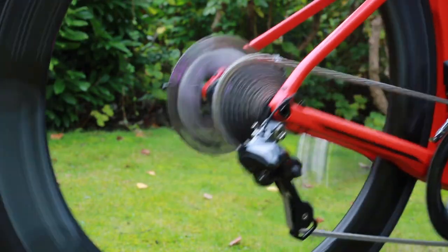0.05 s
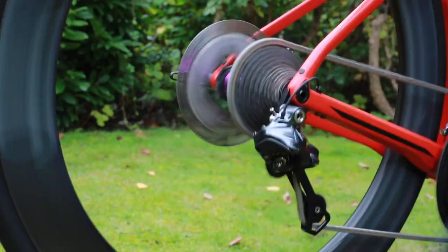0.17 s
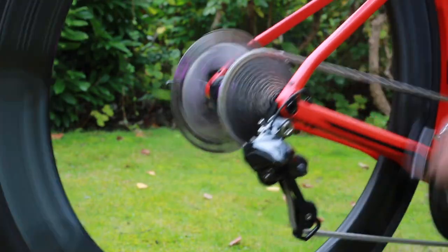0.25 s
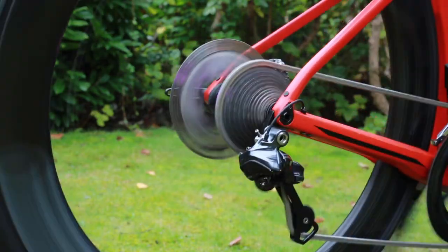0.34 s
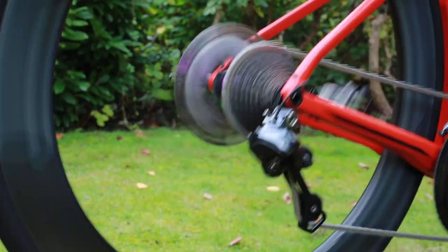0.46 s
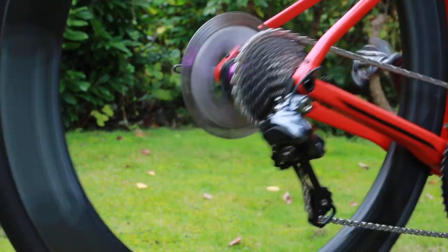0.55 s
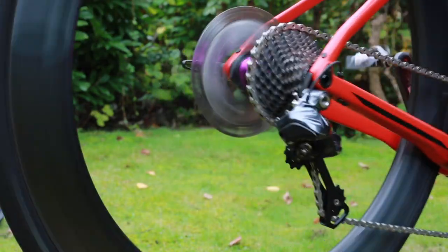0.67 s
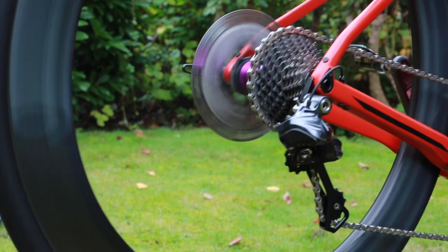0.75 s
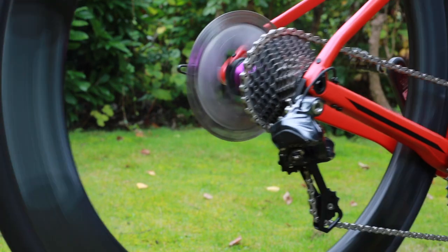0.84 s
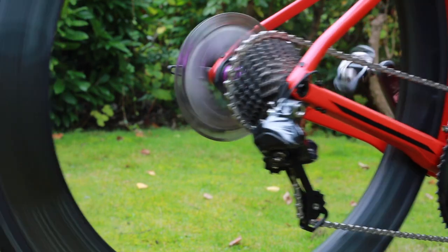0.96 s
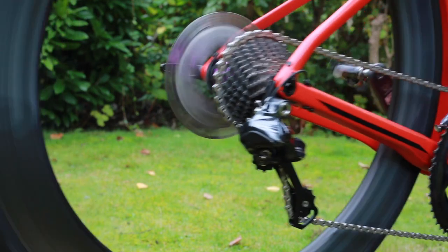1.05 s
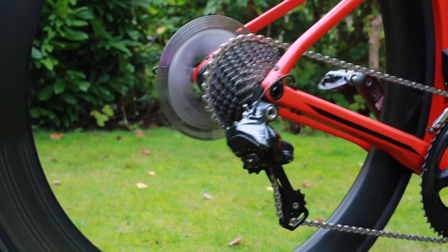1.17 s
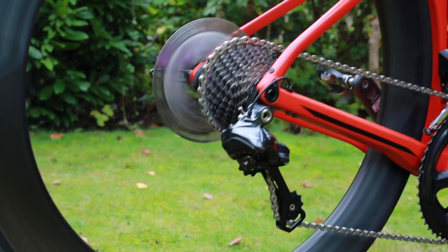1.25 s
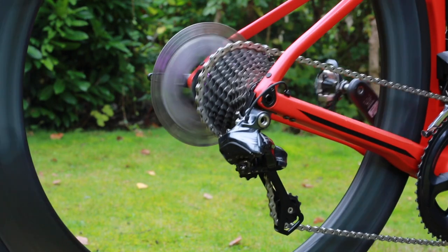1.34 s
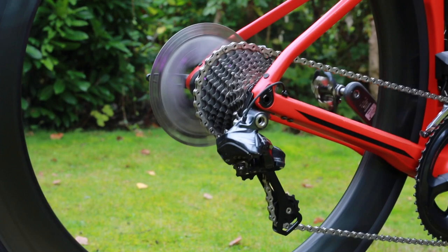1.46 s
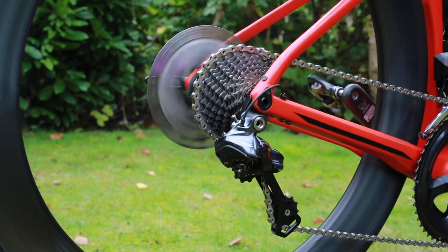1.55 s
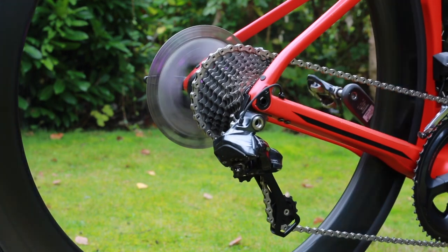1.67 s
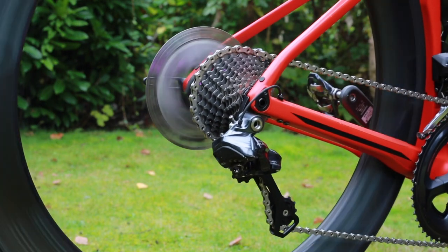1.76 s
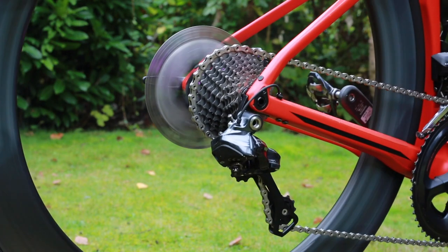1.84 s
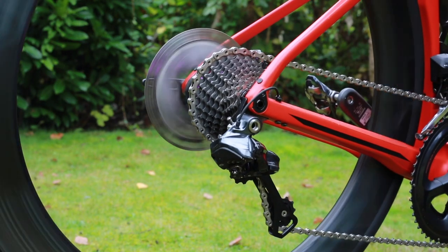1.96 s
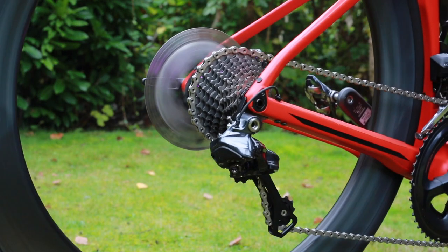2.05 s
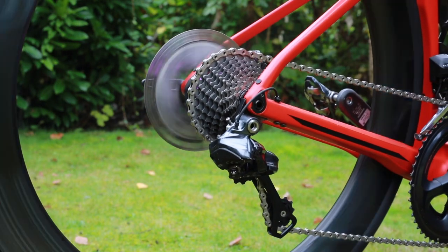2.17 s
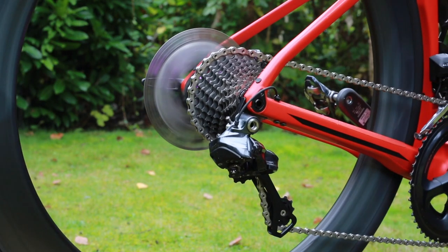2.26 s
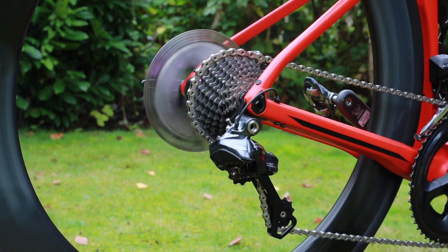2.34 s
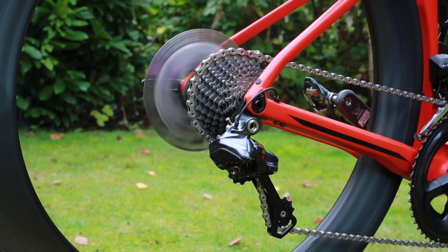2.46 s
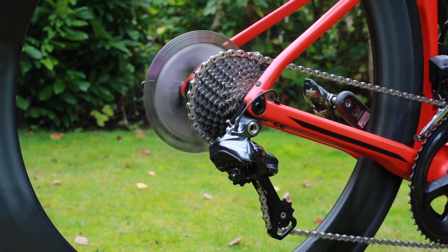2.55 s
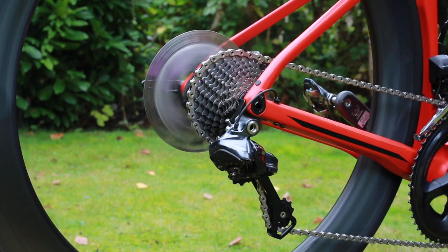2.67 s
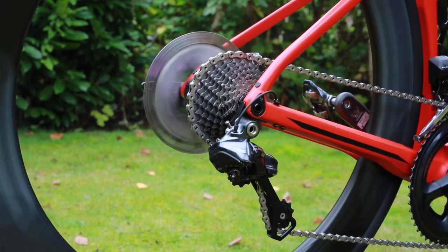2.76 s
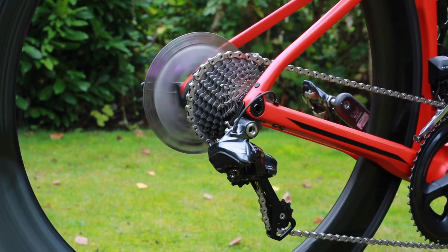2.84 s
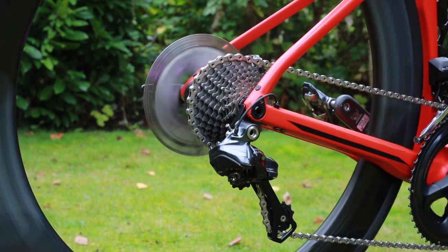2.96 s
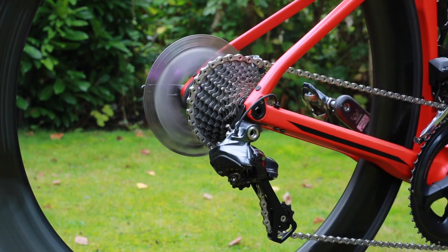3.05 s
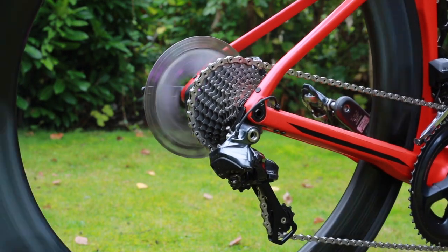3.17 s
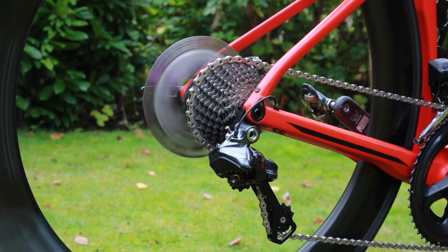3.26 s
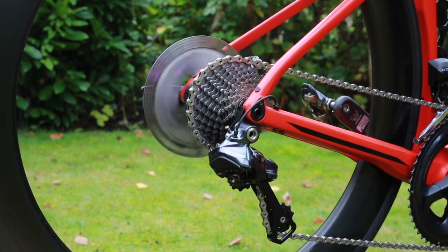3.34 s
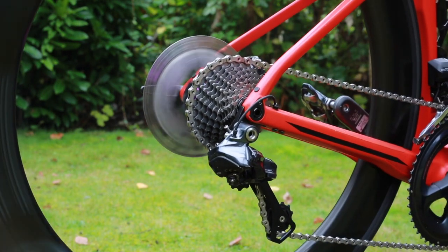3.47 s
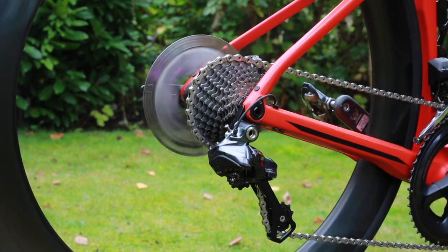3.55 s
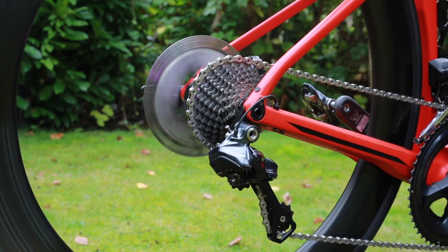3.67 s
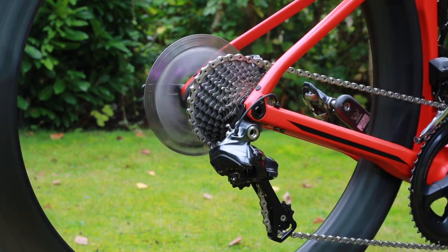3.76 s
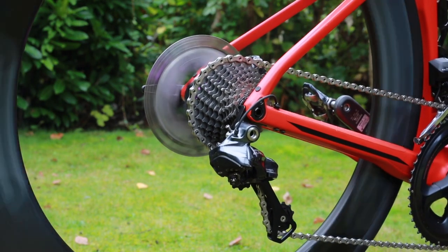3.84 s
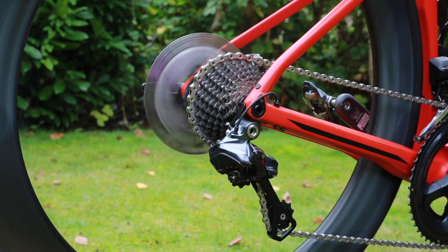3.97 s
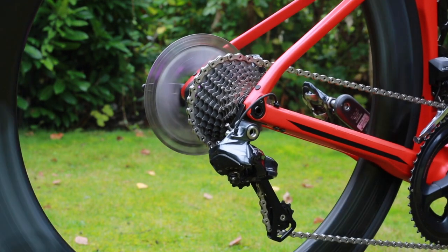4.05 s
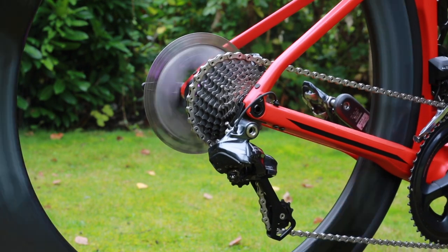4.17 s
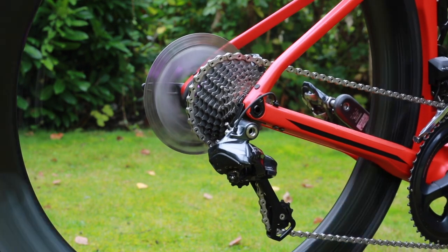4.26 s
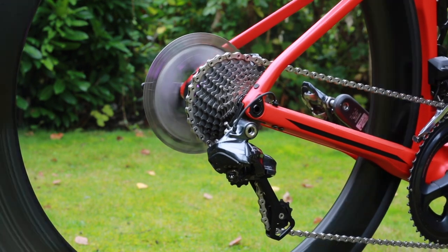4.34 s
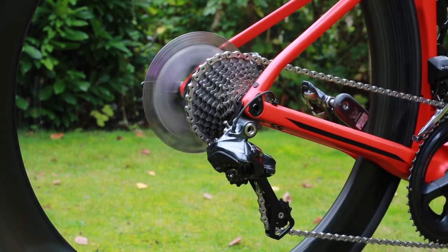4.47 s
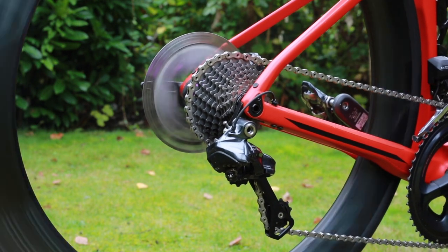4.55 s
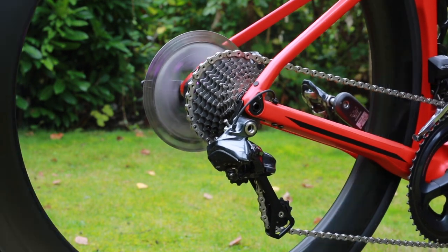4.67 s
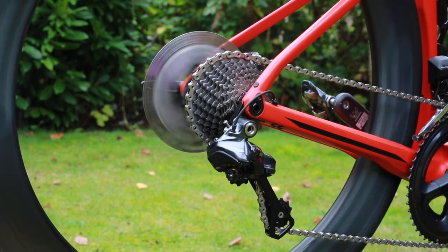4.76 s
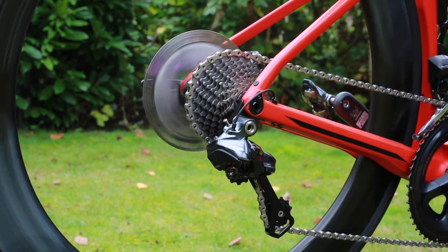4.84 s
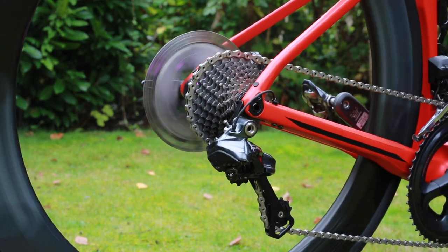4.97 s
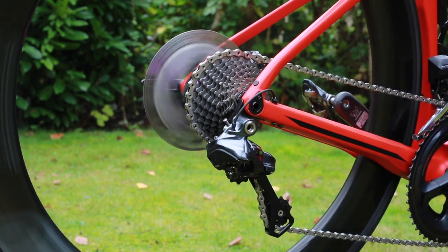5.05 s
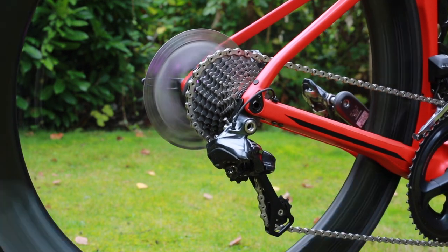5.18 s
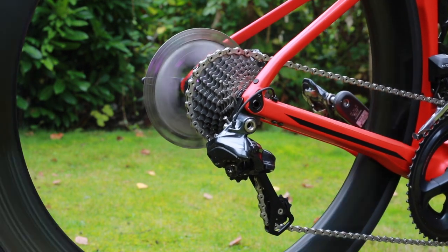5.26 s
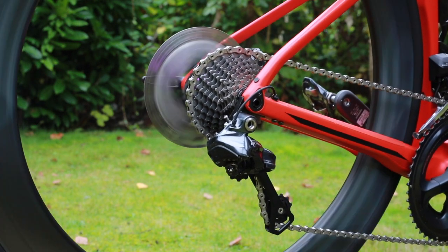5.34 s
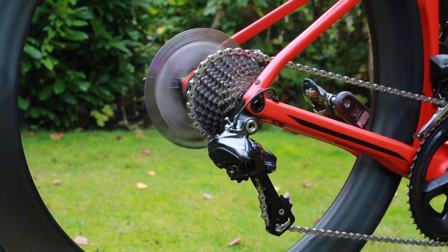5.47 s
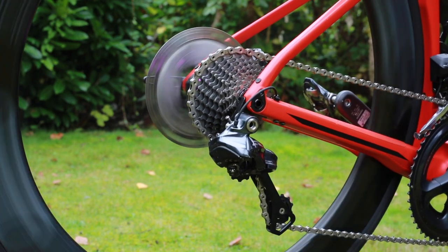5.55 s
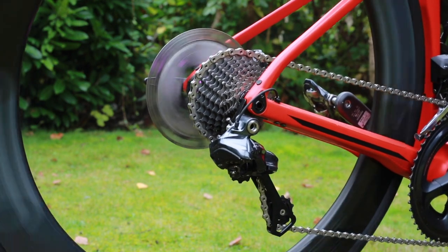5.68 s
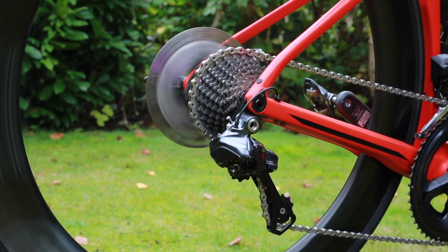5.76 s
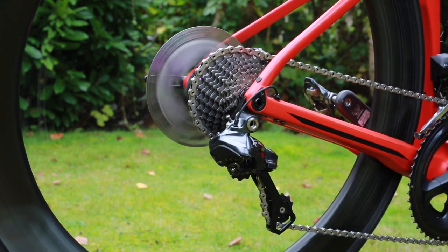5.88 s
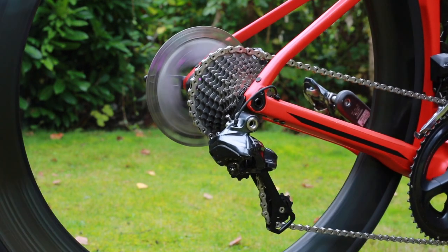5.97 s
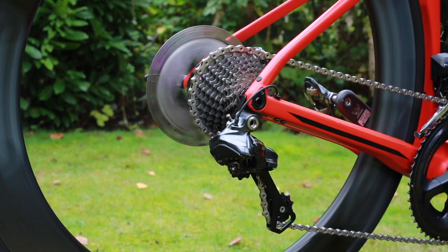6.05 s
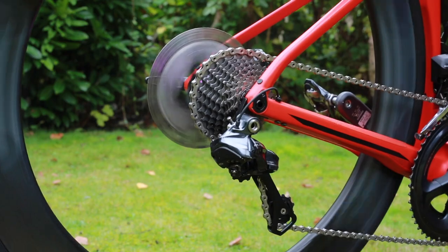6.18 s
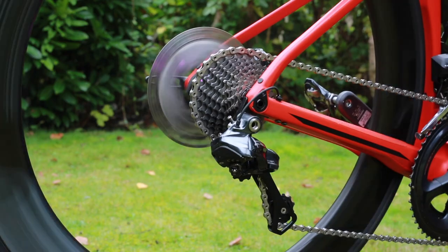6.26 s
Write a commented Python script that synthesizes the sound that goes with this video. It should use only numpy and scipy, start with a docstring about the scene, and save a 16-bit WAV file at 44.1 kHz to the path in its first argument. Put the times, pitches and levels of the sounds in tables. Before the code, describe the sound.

Outdoors, one close microphone hears a bicycle's spinning rear wheel in dry mono. From 0 s there is a low, wavering hum with soft rumble, airy whirr and very fast chain ticking over sprockets. A short metallic rattle comes at 0.12 s, and the chain slaps the frame dully at 0.21 s. Around 0.5 s the drive slackens with a quick cluster of clacks; chain ticking dies by 0.6 s and the air noise drops. From about 0.57 s the freewheel ratchet takes over: a loud, bright, gritty metallic buzz, its pitch climbing until about 0.7 s. Then it sinks smoothly, from roughly 300 tooth clicks a second to about 245 by the end, slightly uneven and shimmering as hub and rim turn. The low hum continues underneath. After 5.15 s everything fades a little, still buzzing at 6.3 s.

```python
"""A bicycle on a stand in a garden, heard by one microphone. From the start there is a low hum with rumble and the
whirr of stirred air, while the chain ticks over the sprockets; the drive slackens over a few lone teeth, and
the chain slaps the frame once. The pedal is let go and the wheel coasts: sprung pawls snap over the ratchet ring
a few hundred times a second and ring the hub, sprockets and deep rim. The buzz climbs as the sprockets run down
to rest, then sinks in pitch as the wheel slows; near the end everything fades a little."""
import sys
import numpy as np
from scipy import signal
from scipy.fft import rfft, irfft
from scipy.io import wavfile

SR = 44100
rng = np.random.default_rng(int(sys.argv[2]) if len(sys.argv) > 2 else 0)


def log_audio(samples):
    """Write samples as a 16-bit WAV file to the path given in sys.argv[1]."""
    # one column per channel
    frames = np.atleast_2d(samples).T
    # limit to full scale, then quantise
    limited = np.clip(frames, -1, 1)
    pcm = np.round(limited * 32767).astype(np.int16)
    wavfile.write(sys.argv[1], SR, pcm)


N = 278491
TIME_S = np.arange(N) / SR

# The low hum, wavering. Each row: time in seconds, first tone in Hz, its octave over the first tone in dB.
HUM_COURSE = [(0, 66.2, -1), (3.5, 66.5, -2), (4.75, 67.6, 1.5), (5.75, 66.4, -2.5), (6.31, 66.1, -5)]
# Spectrum of the rumble. Each row: frequency in Hz, relative level per Hz in dB.
RUMBLE_SPECTRUM = [(15, -39), (25, -12), (54, -24), (102, 4), (134, 1), (152, -1), (177, 2), (221, 3),
                   (327, -20), (500, -15), (650, -54), (1100, -120)]
# Spectrum of the stirred air. Each row: frequency in Hz, relative level per Hz in dB.
WHIRR_SPECTRUM = [(150, -24), (260, -7), (420, -11.5), (930, 0), (1300, 1.5), (1950, -6), (5300, -11.5),
                  (8600, -7), (15500, -23)]
# The chain running over the sprockets. Each row: time in seconds, links per second, level in dB.
CHAIN_RUN = [(0, 124, -35), (.2, 140, -35.5), (.45, 144, -33.5), (.5, 200, -34), (.56, 120, -29),
             (.62, 48, -60)]
# What rings in the chain. Each row: frequency in Hz, width in Hz, relative level in dB.
LINK_MODES = [(3030, 730, -11), (4050, 230, 0.5), (6630, 400, 4), (8400, 680, 2), (11700, 1700, -12.5),
              (13200, 1500, -21)]
# Single teeth skipped while the drive slackens. Each row: start in seconds, blow in dB,
# spread of the pawls in ms, build-up as a plain number (over 1 swells first).
SKIPPED_TEETH = [(.1165, 17.5, 2.2, 2.9), (0.4844, 18.5, 4.7, 1.09), (0.503, 18, 4.5, 0.91),
                 (0.5441, 21, 1.9, 1.8)]
# The chain slaps the frame. Each row: start in seconds, blow in dB, rattle in ms.
FRAME_KNOCKS = [(0.2135, 14, 4.4)]
# What rings in the frame when slapped. Each row: frequency in Hz, width in Hz, level in dB.
FRAME_MODES = [(584, 80, 5), (930, 73, 5), (1410, 260, 0.5), (2660, 1400, -10), (4680, 1400, -5),
               (9000, 5000, -26)]
# The pawls around the ring. Each row: lag behind the tooth in ms, relative strength in dB.
PAWL_SET = [(0, 0), (.07, -3), (.03, -1)]
# What rings in hub shell, sprockets and spokes. Each row: frequency in Hz, width in Hz, level in dB.
HUB_MODES = [(3085, 120, -10), (3230, 55, -6), (3380, 120, -8.5), (3850, 400, -11.5), (4555, 780, -16.5),
             (5515, 29, -2), (5835, 200, -5.5), (6075, 53, -3.5), (6395, 28, -5), (6515, 74, .5),
             (6730, 84, -6.5), (6850, 230, -5.5), (7600, 220, -12), (8210, 270, -11), (8830, 320, -10.5),
             (9380, 200, -11), (10370, 620, -11.5), (10750, 88, -7), (11320, 640, -8.5), (11950, 460, -7.5),
             (12820, 450, -14.5), (13410, 270, -13), (14340, 1030, -13.5), (14860, 290, -10),
             (15560, 530, -14)]
# What rings in the deep rim and frame tubes. Each row: frequency in Hz, width in Hz, level in dB.
RIM_MODES = [(622, 350, -28), (736, 225, -18), (980, 54, -6.5), (1325, 59, -7), (1494, 39, -6.5),
             (1739, 170, -9.5), (1990, 63, -11.5), (2680, 100, -11)]
# The ringing parts turn with the wheel, so modes swell as their lobes face the listener. Each row: lowest mode
# in Hz, upper limit in Hz, swells per turn, swing in dB either way, loudest place as a share of a turn.
TURNING_LOBES = [(1200, 1420, 2, 2, .19), (1200, 1420, 4, 1.5, .115), (1200, 1420, 6, 2.6, .147),
                 (1200, 1600, 1, 1, 0), (1420, 1600, 2, 2.8, .106), (1420, 1600, 4, 1, .09),
                 (1600, 2100, 2, 1.2, .085), (2950, 3500, 2, .8, .444), (2950, 6200, 1, 1.1, .3),
                 (5400, 6200, 4, 1, .22), (5700, 7000, 3, .9, .2), (6300, 7000, 1, 1.1, .16),
                 (6300, 7000, 4, 1, .12), (5700, 6600, 2, .7, .115)]

HUM_DB, HUM_THIRD_DB, RUMBLE_DB = -46.5, -67.5, -51
SIDE_TONE_HZ, SIDE_TONE_DB = 223.7, -59.5

# Stirred air: level while pedalled and while coasting, and how long it takes to drop from let-go.
WHIRR_DRIVEN_DB, WHIRR_COAST_DB, WHIRR_DROP_S = -35, -43.5, 0.16

# The wheel coasts against air drag: teeth per second at let-go; the time per tooth grows steadily (ms per s).
TEETH = 60
LET_GO_S, START_TEETH_PER_S, DRAG_MS_PER_S = .543, 320.8, .168
# The sprockets run down to rest; a bend under 1 brakes hardest at first.
RUN_DOWN_S, RUN_DOWN_BEND, FIRST_TOOTH_S = .137, .75, .565

# How true the pawls keep time: ring runout and slow wander (share of a tooth), scatter from snap to snap (ms).
RUNOUT_TEETH, WANDER_TEETH, JITTER_MS = .025, .014, .025
# The bicycle still shakes after let-go and pulls all pawls off time together: share of a tooth, dying away (s).
SHAKE_TEETH, SHAKE_SETTLE_S = .07, 2.2

BUZZ_DB, BUZZ_SAG_DB_PER_S = -19, 0.09
BLOW_SOFT_HZ = 9000  # the blow itself is softened above this
BOUNCE_DB, BOUNCE_MS, LIGHT_HZ = 11, 3, 1650  # the bounces are thinned below LIGHT_HZ

FADE_S, FADE_DB_PER_S = 5.15, 4
CUTOFF_HZ = 15750


def from_db(db):
    """Turn dB into gain."""
    return 10 ** (np.asarray(db) / 20)


def rms_one(x):
    """Scale to rms 1."""
    return x / np.sqrt(np.mean(x ** 2) + 1e-20)


def in_time(rows, s=TIME_S):
    """Read the columns of a table at the times s, in straight lines between its rows."""
    times, *columns = np.transpose(rows)
    return [np.interp(s, times, column) for column in columns]


def ramp(start_s, length_s):
    """0 before the start, then rising straight to 1."""
    return np.clip((TIME_S - start_s) / length_s, 0, 1)


def drift(rate_hz):
    """Slow random wander of rms 1: noise through two equal low-pass poles, worked out every 40 samples."""
    pole = np.exp(-2 * np.pi * rate_hz * 40 / SR)
    noise = rng.standard_normal(N // 40 + 2002)
    slow = signal.lfilter([1], [1, -2 * pole, pole * pole], noise)[2000:]  # settled part only
    return np.interp(np.arange(N) / 40, np.arange(len(slow)), rms_one(slow))


def drift_at(rate_hz, s):
    """A new drift, read at the times s."""
    return drift(rate_hz)[(s * SR).astype(int)]


def coloured(spectrum):
    """Noise of rms 1 with a spectrum given per Hz."""
    hz, level_db = np.transpose(spectrum)
    grid_hz = np.maximum(np.fft.rfftfreq(N, 1 / SR), 1)
    gain = from_db(np.interp(np.log(grid_hz), np.log(hz), level_db))
    return rms_one(irfft(rfft(rng.standard_normal(N)) * gain, N))


def clicks(s, sizes):
    """One-sample clicks at the times s."""
    at = np.round(np.ravel(s) * SR).astype(int)
    inside = (at >= 0) & (at < N)
    return np.bincount(at[inside], np.ravel(sizes)[inside], N)


def passings(rows):
    """Times at which a counting rate passes each whole number, from the first row to the last."""
    s = np.arange(round(rows[0][0] * SR), round(rows[-1][0] * SR)) / SR
    count = np.cumsum(in_time(rows, s)[0]) / SR
    return np.interp(np.arange(int(count[-1])), count, s)


def chatter(s, sizes, spread_ms, count, buildup=1):
    """After each blow the part bounces: uneven clicks of either sign, thinning out; a build-up over 1 swells first."""
    shape = np.reshape(np.maximum(buildup, 1), (-1, 1))
    late_s = rng.gamma(shape, 1, (len(s), count)) * np.reshape(spread_ms, (-1, 1)) / 1000
    uneven = rng.standard_normal((len(s), count)) / np.sqrt(count)
    return clicks(s[:, None] + late_s, sizes[:, None] * uneven)


def resonate(drives, modes, turning=False):
    """Parallel two-pole resonances, signs alternating; neighbours are dealt the drives in turn."""
    out = np.zeros(N)
    for k, (hz, width_hz, level_db) in enumerate(modes):
        radius = np.exp(-np.pi * width_hz / SR)
        poles = [1, -2 * radius * np.cos(2 * np.pi * hz / SR), radius * radius]
        zeros = np.array([1, 0, -1]) * (1 - radius * radius) / 2
        ringing = signal.lfilter(zeros, poles, drives[k % len(drives)] + 1e-18)
        gain = from_db(level_db) * (facing(hz) if turning else 1)
        out += (-1) ** k * gain * ringing
    return out


def hum():
    """A wavering low tone with two overtones, a fainter tone beside them, and low rumble made of noise."""
    hz, octave_db = in_time(HUM_COURSE)
    phase = 2 * np.pi * np.cumsum(hz) / SR
    tones = from_db(HUM_DB) * (np.sin(phase) + from_db(octave_db) * np.sin(2 * phase))
    tones += from_db(HUM_THIRD_DB + 5.3 * drift(4.0)) * np.sin(3 * phase)
    side_tone = np.sin(2 * np.pi * SIDE_TONE_HZ * TIME_S)
    tones += from_db(SIDE_TONE_DB + 2.3 * drift(0.66)) * side_tone
    return np.sqrt(2) * tones + from_db(RUMBLE_DB) * coloured(RUMBLE_SPECTRUM)  # tone levels are rms


def whirr():
    """Air stirred by spokes and chain: fluttering noise, strongest between 1 and 2 kHz, dropping at let-go."""
    level_db = WHIRR_DRIVEN_DB + (WHIRR_COAST_DB - WHIRR_DRIVEN_DB) * ramp(LET_GO_S, WHIRR_DROP_S)
    flutter_db = 1.5 * drift(21.0)
    return from_db(level_db + flutter_db) * coloured(WHIRR_SPECTRUM)


def chain(jitter_ms=0.39, scatter_db=1.5, seat_ms=0.99):
    """Each link seats on a tooth with a short tick, and its tug shakes the wheel."""
    s = passings(CHAIN_RUN)
    chance = rng.standard_normal((len(s), 2))
    seated_s = s + jitter_ms * chance[:, 0] / 1000
    sizes = from_db(scatter_db * chance[:, 1])
    ticks = chatter(seated_s, sizes, seat_ms, count=8)
    tugs = clicks(s + 0.21 * (seated_s - s), sizes)  # the heavy tug keeps better time than the tick
    rung = resonate([ticks], LINK_MODES)
    rung += from_db(-11.5) * np.diff(ticks, prepend=0)  # the bare tick is broad and bright
    rung += resonate([from_db(9.5) * ticks + from_db(7.5) * tugs], RIM_MODES)
    even = np.std(rung[:round(s[-1] * SR)])  # up to the last link
    return from_db(in_time(CHAIN_RUN)[1]) * rung / even


def skips():
    """Lone teeth: the pawls rattle in one after another and ring hub and rim."""
    s, level_db, spread_ms, buildup = np.transpose(SKIPPED_TEETH)
    rattles = [chatter(s, from_db(level_db), spread_ms, count=80, buildup=buildup) for _ in range(5)]
    return resonate(rattles, HUB_MODES) + from_db(-6.0) * resonate(rattles, RIM_MODES)


def knock():
    """The chain slaps the frame: one dull slap and a short rattle ring the frame."""
    s, level_db, rattle_ms = np.transpose(FRAME_KNOCKS)
    size = from_db(level_db)
    slap = signal.lfilter([.15], [1, -.85], clicks(s, size))  # a soft contact
    rattle = chatter(s, size, rattle_ms, count=30)
    return resonate([from_db(-2.0) * slap + rattle], FRAME_MODES)


def wheel(s):
    """Wheel speed in teeth per second, the time per tooth growing steadily under drag."""
    return 1 / (1 / START_TEETH_PER_S + DRAG_MS_PER_S / 1000 * (s - LET_GO_S))


def slip():
    """Teeth passing the pawls per second, as rows (s, rate): the wheel's speed less that of the sprockets."""
    s = np.arange(round(FIRST_TOOTH_S * SR), N) / SR
    share = np.minimum((s - LET_GO_S) / RUN_DOWN_S, 1) ** RUN_DOWN_BEND
    return np.transpose([s, wheel(s) * share])


def facing(hz):
    """Gain of a mode as its lobes turn past the listener with the wheel."""
    turns = np.cumsum(wheel(TIME_S)) / SR / TEETH
    turns -= turns[round(LET_GO_S * SR)]
    return from_db(sum(swing_db * np.cos(2 * np.pi * swells * (turns - loudest))
                       for low, high, swells, swing_db, loudest in TURNING_LOBES if low <= hz < high))


def pawl_snaps(scatter_db=1.1):
    """Times and sizes of the snaps: the ring runs out of true, so each pawl leads and lags once a turn."""
    rate = slip()
    s = passings(rate)
    teeth_per_s = in_time(rate, s)[0][:, None]
    lag_ms, strength_db = np.transpose(PAWL_SET)
    pawls = len(PAWL_SET)
    angle = 2 * np.pi * (np.arange(len(s))[:, None] / TEETH - np.arange(pawls) / pawls)
    wander = np.transpose([drift_at(12.0, s) for _ in range(pawls)])
    shake = SHAKE_TEETH * np.exp((LET_GO_S - s) / SHAKE_SETTLE_S) * drift_at(15.0, s)
    late_teeth = RUNOUT_TEETH * np.cos(angle) + WANDER_TEETH * wander + shake[:, None]
    chance = rng.standard_normal((len(s), 2, pawls))
    late_ms = lag_ms + JITTER_MS * chance[:, 0]
    snap_s = s[:, None] + late_teeth / teeth_per_s + late_ms / 1000
    return snap_s, from_db(strength_db + scatter_db * chance[:, 1])


def ratchet(throb_db=0.37, flutter_db=1.5):
    """At every tooth the pawls snap down and bounce, ringing rim and hub as they turn."""
    snap_s, sizes = pawl_snaps()
    # the bounces are too light to move the rim; seven independent trains are dealt to the modes in turn
    light = signal.butter(2, LIGHT_HZ, "high", fs=SR, output="sos")
    bounces = [chatter(snap_s.ravel(), sizes.ravel(), BOUNCE_MS, count=9) for _ in range(7)]
    blow = signal.lfilter(*signal.butter(1, BLOW_SOFT_HZ, fs=SR), clicks(snap_s, sizes))
    blows = blow + from_db(BOUNCE_DB) * signal.sosfilt(light, bounces)
    waver_db = np.array([throb_db * drift(3.3) + flutter_db * drift(25.0) for _ in blows])
    strength = from_db(BUZZ_DB - BUZZ_SAG_DB_PER_S * TIME_S + waver_db)
    modes = RIM_MODES + HUB_MODES
    even = np.sqrt(np.mean(resonate(blows, modes) ** 2))  # rms without wavering or turning
    return resonate(blows * strength / even, modes, turning=True)


def scene():
    """One microphone, the same in both channels."""
    return np.tile(hum() + whirr() + chain() + skips() + knock() + ratchet(), (2, 1))


def record(dry):
    """A slow fade near the end; the top is cut steeply."""
    faded = dry * from_db(-FADE_DB_PER_S * np.maximum(TIME_S - FADE_S, 0))
    return signal.sosfilt(signal.ellip(14, .3, 70, CUTOFF_HZ, fs=SR, output="sos"), faded)


dry = scene()
out = record(dry)
log_audio(out)
```